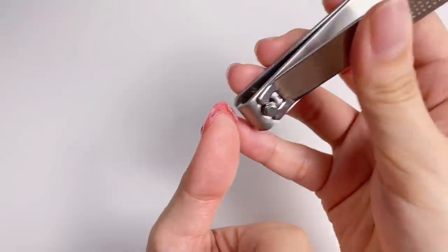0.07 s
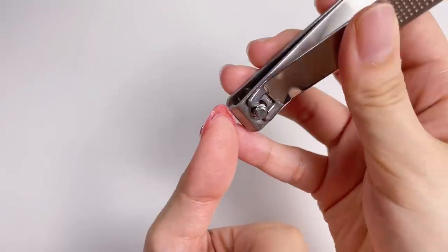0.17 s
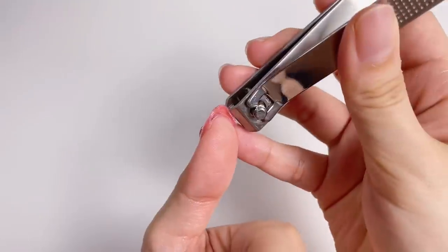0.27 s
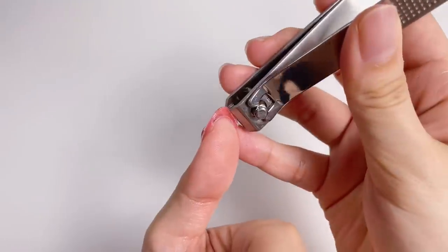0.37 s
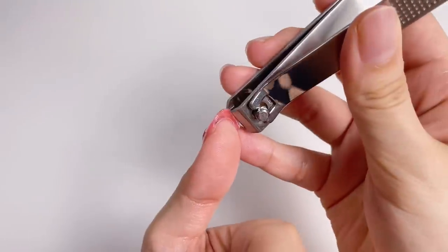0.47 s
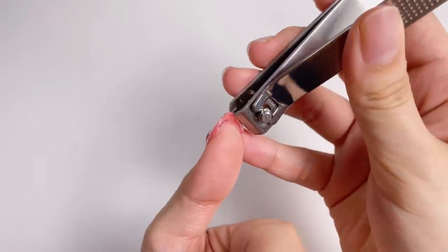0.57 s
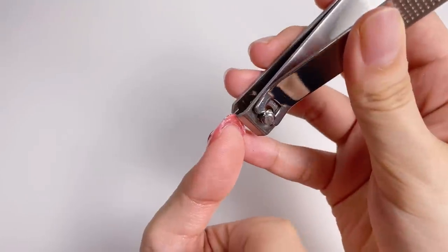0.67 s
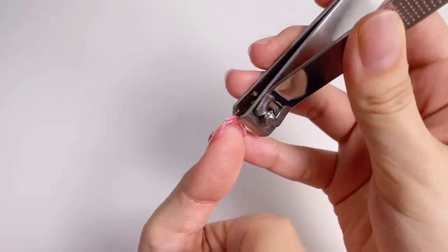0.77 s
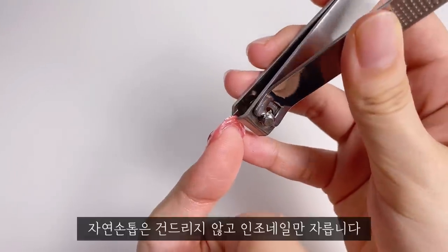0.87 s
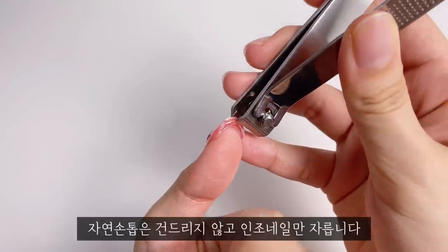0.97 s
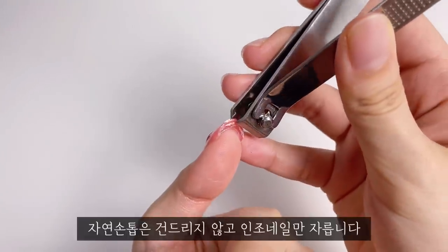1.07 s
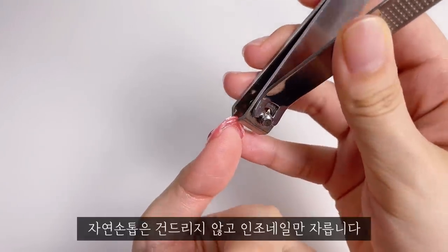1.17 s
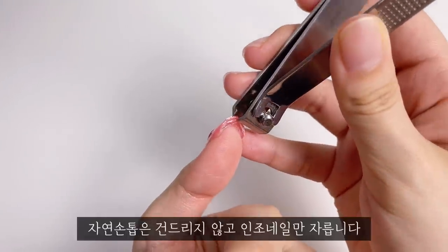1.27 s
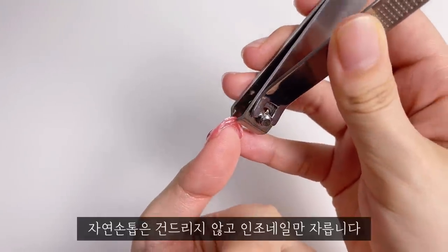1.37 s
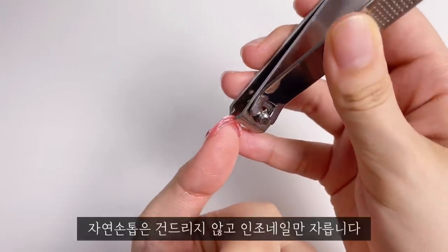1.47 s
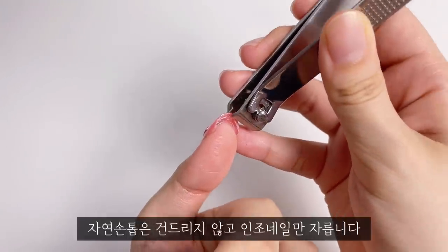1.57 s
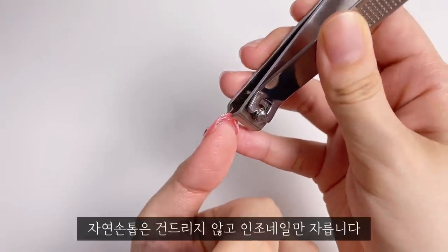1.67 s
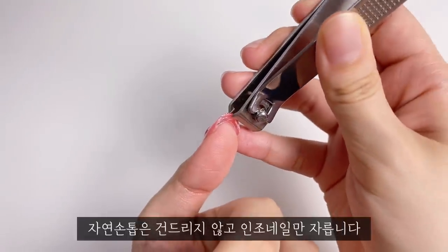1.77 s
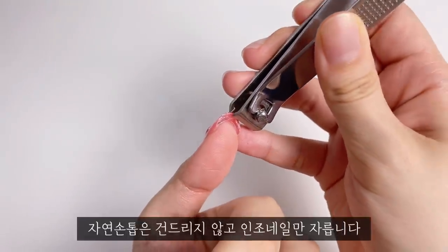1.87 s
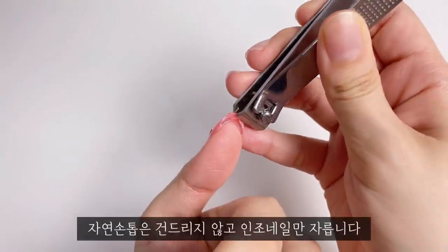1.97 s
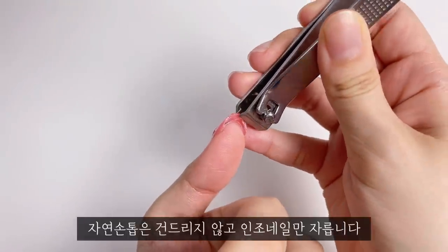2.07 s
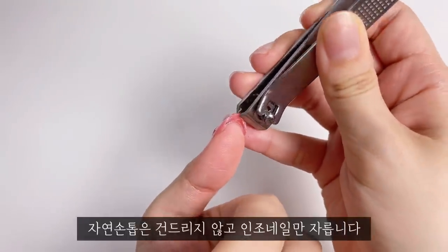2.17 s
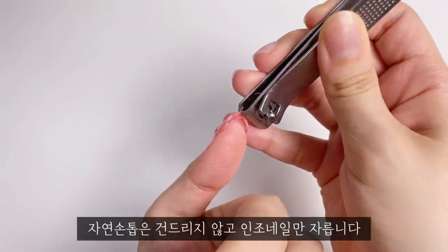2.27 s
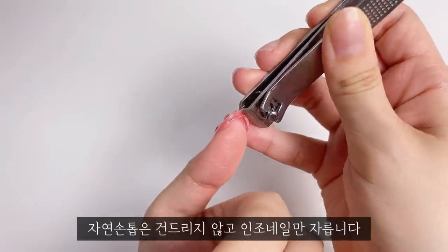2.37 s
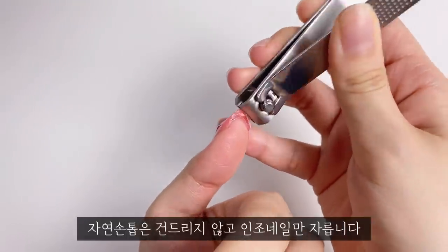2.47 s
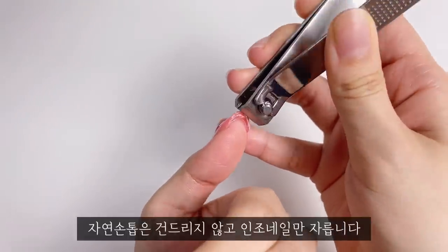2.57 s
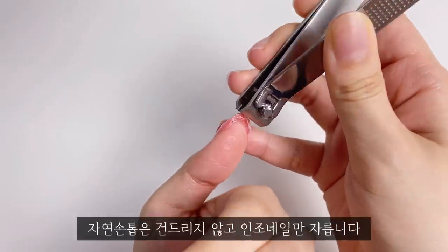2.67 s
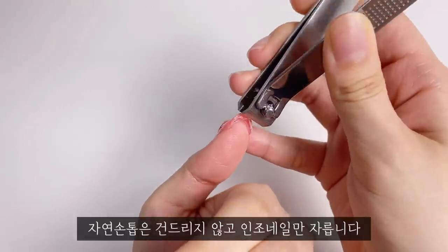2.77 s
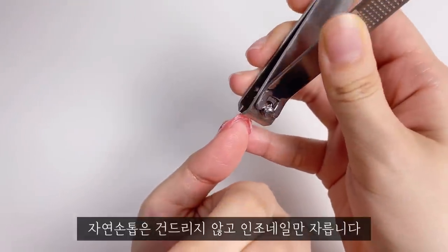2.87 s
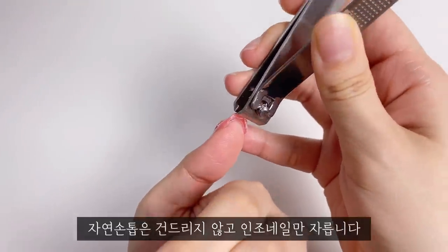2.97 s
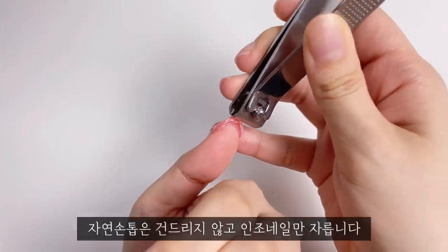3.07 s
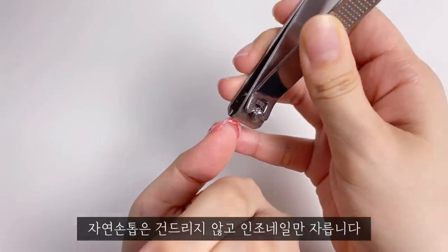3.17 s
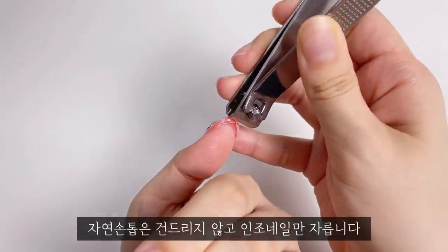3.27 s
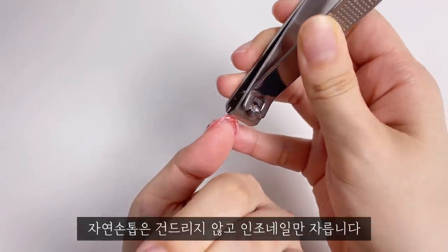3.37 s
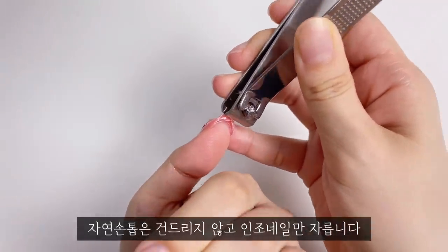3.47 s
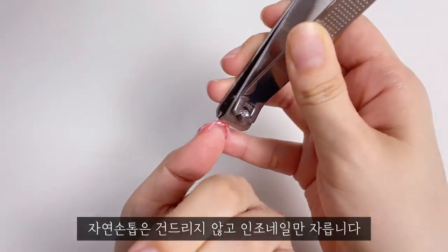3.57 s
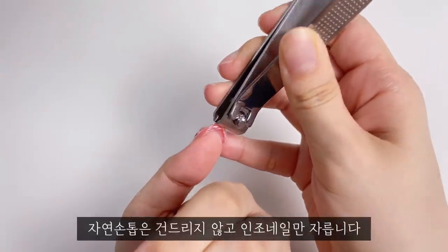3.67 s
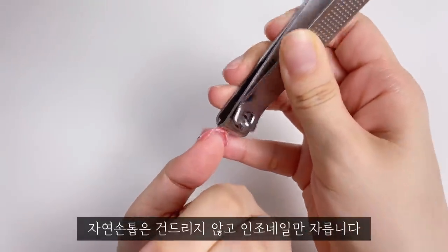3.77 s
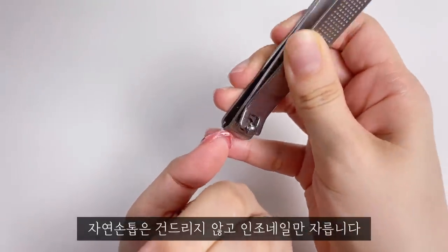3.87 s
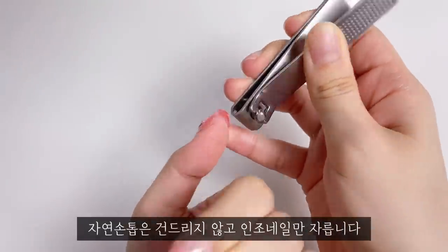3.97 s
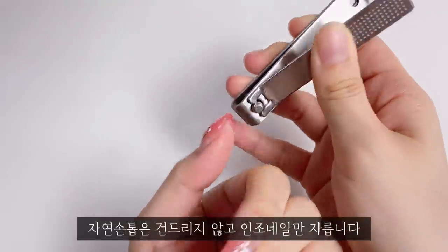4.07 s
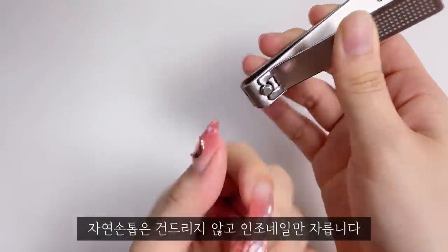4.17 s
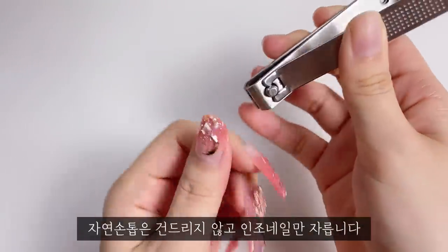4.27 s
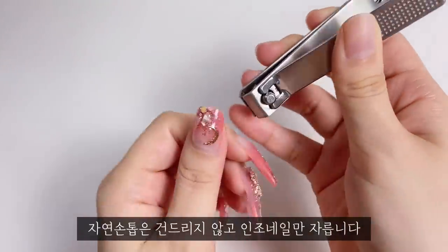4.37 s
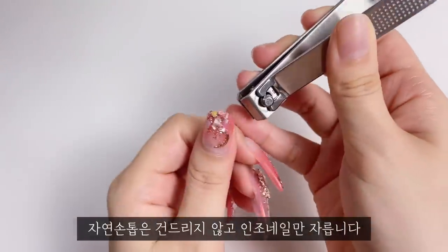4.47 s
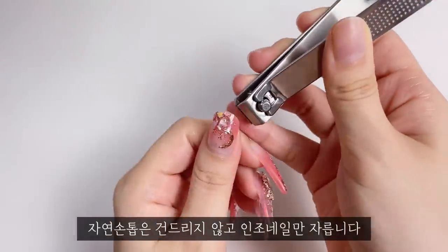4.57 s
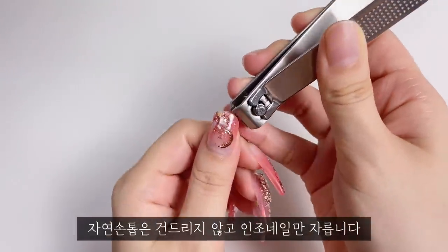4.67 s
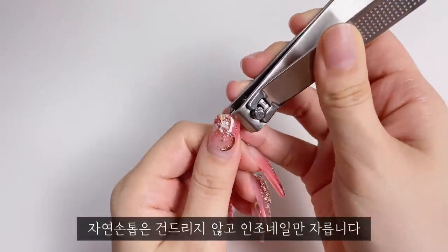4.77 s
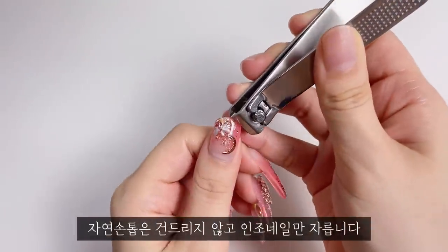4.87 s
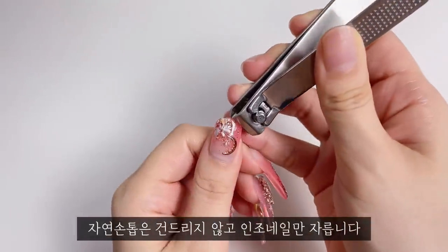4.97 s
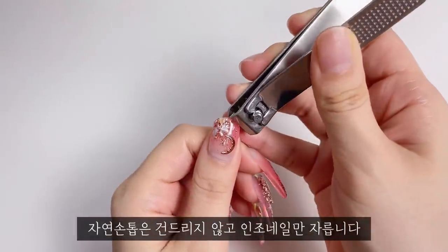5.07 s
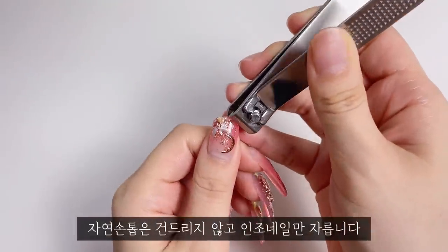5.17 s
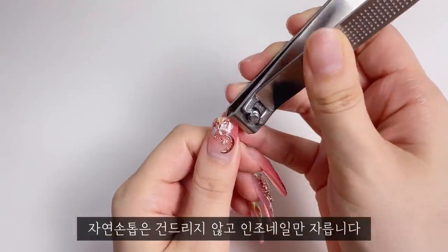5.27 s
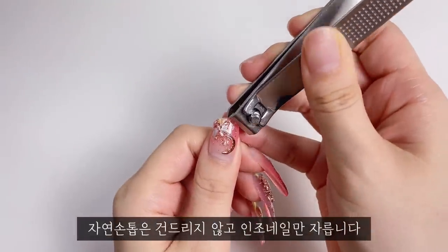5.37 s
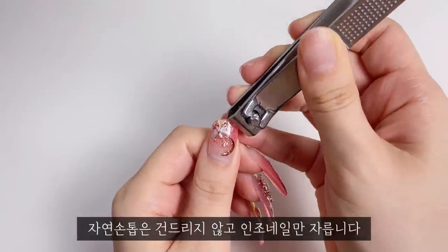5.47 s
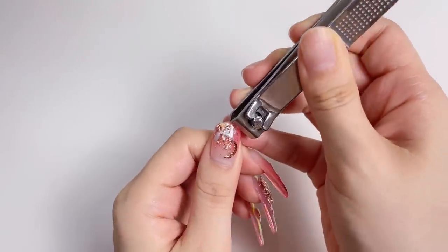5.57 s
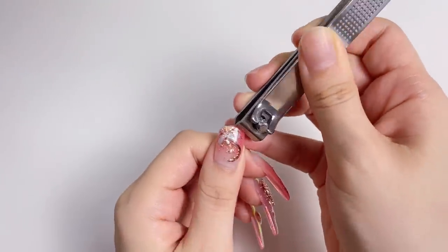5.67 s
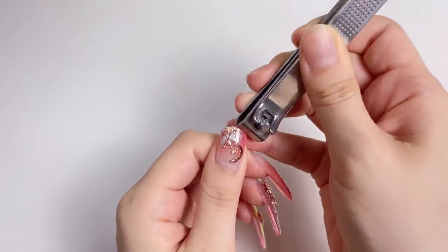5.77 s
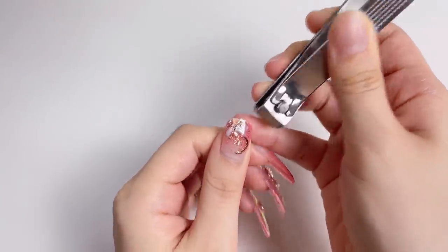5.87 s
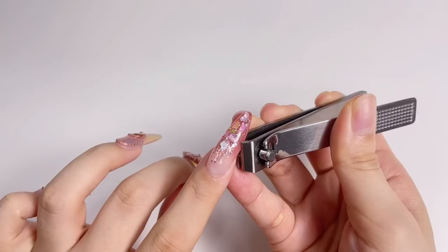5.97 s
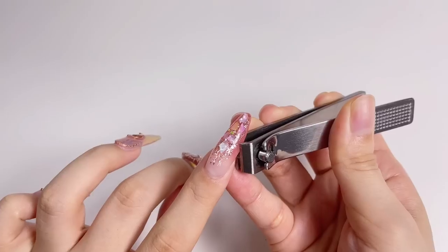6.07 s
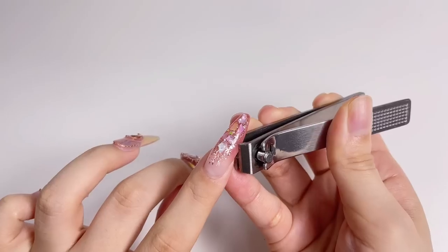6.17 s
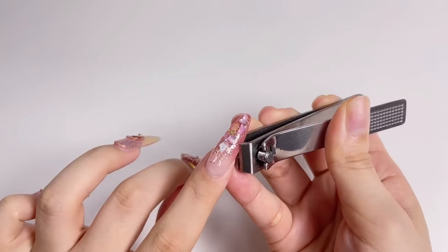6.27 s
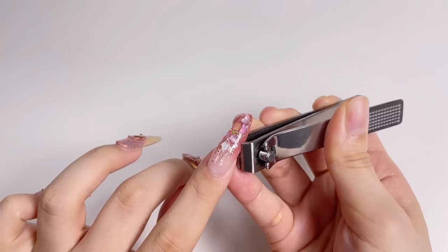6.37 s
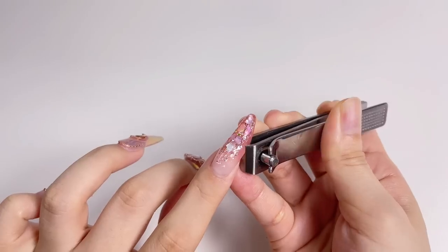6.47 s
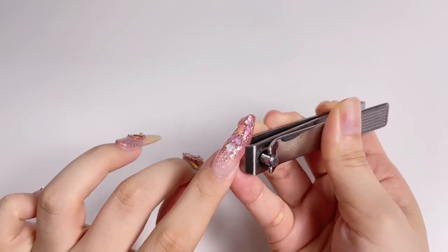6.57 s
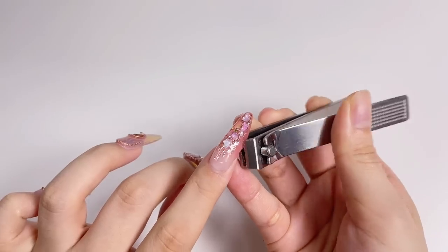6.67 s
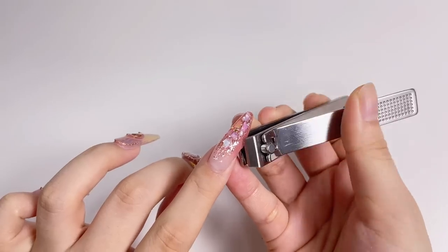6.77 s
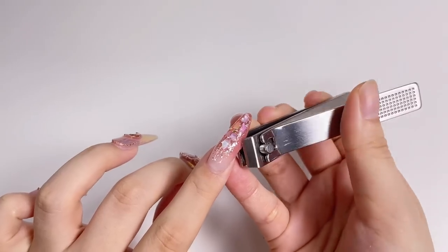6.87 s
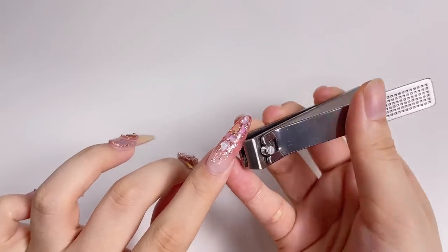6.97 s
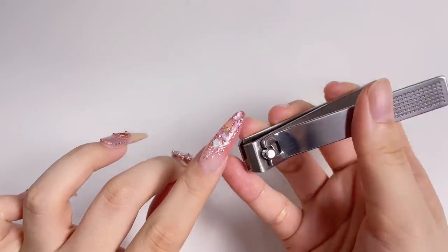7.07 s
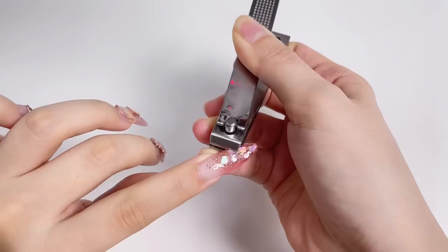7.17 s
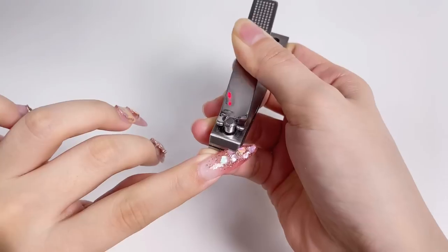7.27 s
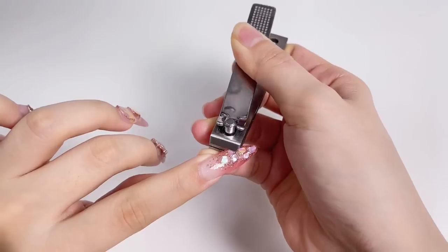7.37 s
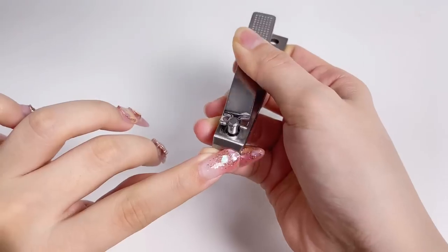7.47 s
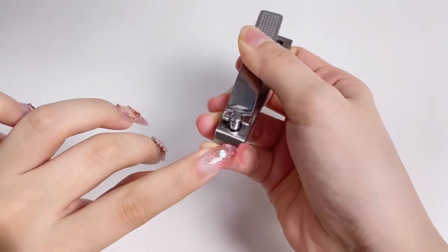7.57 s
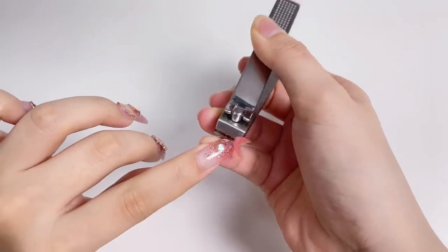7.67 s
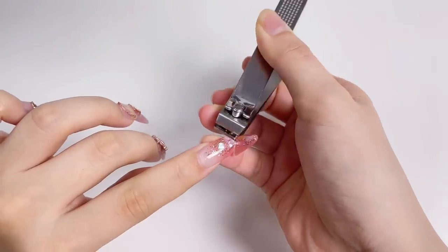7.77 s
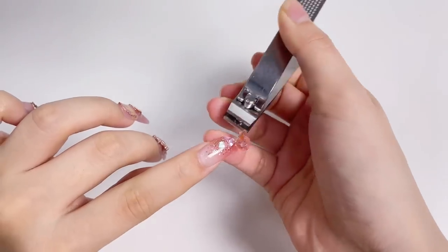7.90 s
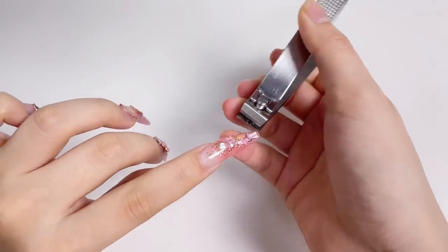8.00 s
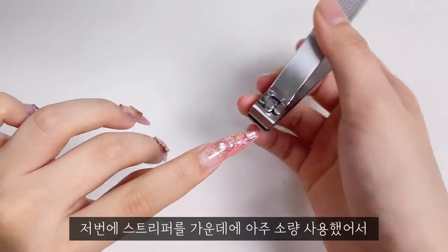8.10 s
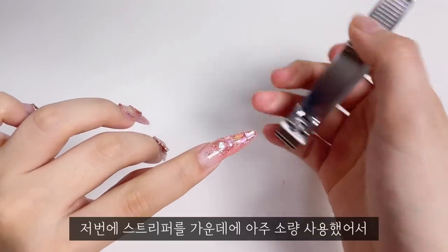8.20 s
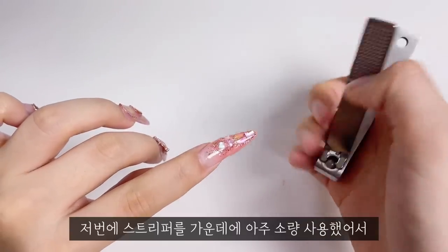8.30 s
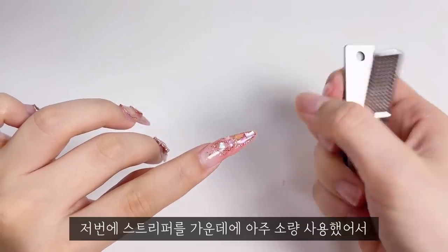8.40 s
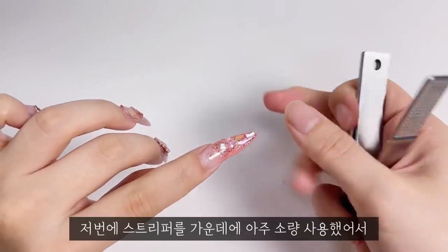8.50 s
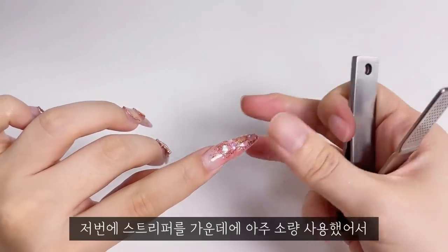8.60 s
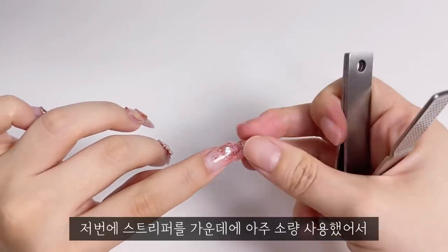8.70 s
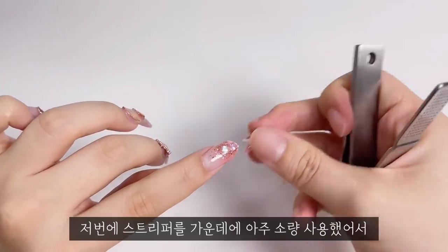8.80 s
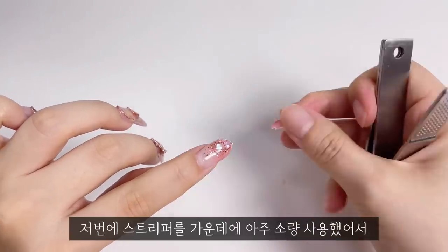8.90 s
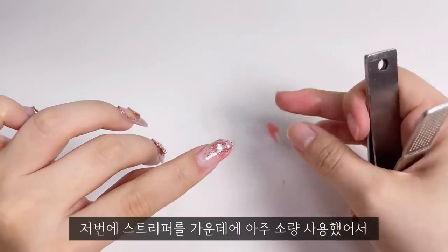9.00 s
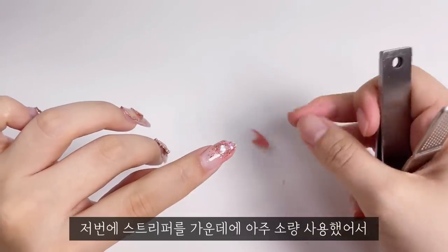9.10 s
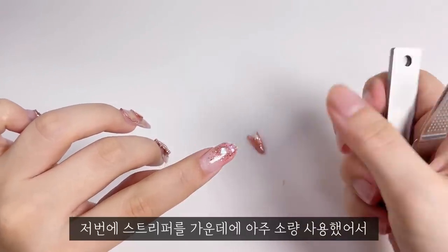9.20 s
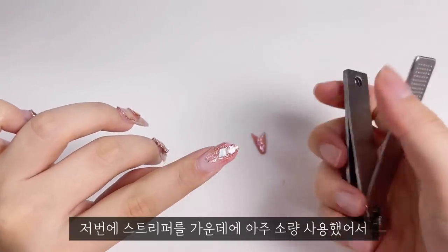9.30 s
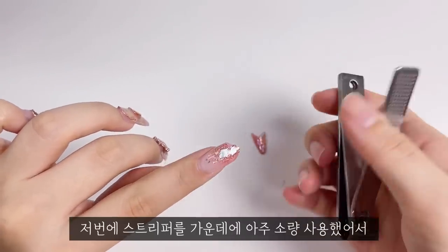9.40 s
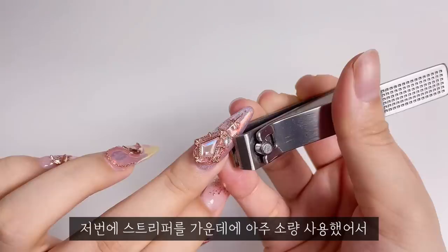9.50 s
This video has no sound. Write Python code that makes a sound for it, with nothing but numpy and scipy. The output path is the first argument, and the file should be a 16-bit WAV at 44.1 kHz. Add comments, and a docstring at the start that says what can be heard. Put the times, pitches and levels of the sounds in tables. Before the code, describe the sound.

Soft room hiss and low hand rumble lie beneath sharp nail clipping. Dry steel clicks separate five violent, bright snaps, each preceded by tiny cracks or accompanied by a dull jolt through the table. The last snaps come closer together, then there is near silence with faint rubbing before a hard little fragment clacks down and rattles to rest. Extremely close stereo miking, short room echo, overloaded peaks.

```python
"""A steel nail clipper at work on hard nail extensions, close to a stereo microphone on a table in a small
room. Hands rub and rumble softly under room air and hiss (shaped noise); first the lever clicks (steel
resonances). Then come bites: the nail crackles (tiny slips ring its resonances) and snaps, ringing the jaws,
jolting the table (decaying sines) and peaking hard enough to be clipped flat; clicks and rubs fall around and
between the bites. Near the end a cut piece drops and bounces, ringing its own resonances; delayed noise echoes
make the room."""
import sys
import numpy as np
from scipy import signal
from scipy.fft import rfft, irfft, next_fast_len
from scipy.io import wavfile

SR = 44100
rng = np.random.default_rng(int(sys.argv[2]) if len(sys.argv) > 2 else 0)


def file_out(sig):
    """Save sig as 16-bit WAV at sys.argv[1]."""
    # one column per channel
    cols = np.atleast_2d(sig).T
    # limit, then scale
    lim = np.clip(cols, -1, 1)
    pcm = np.round(lim * 32767).astype(np.int16)
    wavfile.write(sys.argv[1], SR, pcm)


N = 420713
TIME = np.arange(N) / SR   # s


def from_db(db):
    """Decibels to gain."""
    return 10 ** (np.asarray(db) / 20)


def rms_one(x):
    """Scale to rms 1."""
    return x / np.sqrt(np.mean(x ** 2) + 1e-20)


def at_hz(points, hz, axis=1):
    """Read one column of a table on a log-frequency axis."""
    columns = np.transpose(points)
    return np.interp(np.log(np.maximum(hz, 1)), np.log(columns[0]), columns[axis])


def add(track, s, sound):
    """Mix a stereo sound in at a time in seconds."""
    i = int(round(s * SR))
    track[:, i:i + sound.shape[1]] += sound[:, :N - i]


def stereo_noise(size, alike):
    """White noise whose two channels correlate by alike: 1 the same, 0 unrelated, -1 opposite."""
    mid, side = rng.standard_normal((2, size))
    opposite = np.array([[1], [-1]])
    return np.sqrt((1 + alike) / 2) * mid + np.sqrt((1 - alike) / 2) * side * opposite


def coloured(spectrum, alike):
    """Steady stereo noise with a given spectrum."""
    size = next_fast_len(N)
    gains = from_db(at_hz(spectrum, np.fft.rfftfreq(size, 1 / SR)))
    return irfft(rfft(stereo_noise(size, alike)) * gains, size)[:, :N]


def resonate(x, hz, width):
    """Two-pole resonance with gain 1 on top."""
    r = np.exp(-np.pi * width / SR)
    zeros = np.array([1, 0, -1]) * (1 - r * r) / 2
    poles = [1, -2 * r * np.cos(2 * np.pi * hz / SR), r * r]
    return signal.lfilter(zeros, poles, x + 1e-18)


def volley(fall_ms, grain_db, alike):
    """A dying run of tiny slips of uneven strength, from a flattened spectrum; returns it with its envelope."""
    fall = fall_ms * SR / 1000
    n = np.arange(next_fast_len(int(3 * fall) + SR // 50))
    envelope = from_db(-20 * n / fall)
    grain = from_db(grain_db * rng.standard_normal(len(n)))
    spectrum = rfft(stereo_noise(len(n), alike) * grain * envelope)
    even = irfft(spectrum / np.abs(spectrum), len(n))
    return even * envelope ** 0.17, envelope


def strikes(events, modes, gain_db, tick_db, contact_db, rise_ms, grain_db, alike):
    """Slips ring the modes of the struck part; gives the direct sound and the room's share."""
    direct, to_room = np.zeros((2, 2, N))
    for s, db, fall_ms, bright_db, room_db, contact_hz in events:
        slips, envelope = volley(fall_ms, grain_db, alike)
        slips = slips * (1 - np.exp(-1000 * TIME[:len(envelope)] / rise_ms))
        ring = 0
        for k, (hz, width, mode_db) in enumerate(modes):
            tilt_db = bright_db * np.log2(hz / 10000)
            gain = from_db(mode_db + tilt_db + rng.normal(0, 1.0))
            ring = ring + (-1) ** k * gain * resonate(slips, hz, width)
        ring = ring + from_db(tick_db) * slips
        # the point of contact favours one pitch
        ring = ring + from_db(contact_db) * resonate(ring, contact_hz, 350)
        # the envelope sets the energy, so modes and brightness do not change the level
        level = np.sqrt(2 * np.sum(envelope ** 2) / np.sum(ring ** 2))
        sound = from_db(db + gain_db) * ring * level
        add(direct, s, sound)
        add(to_room, s, sound * from_db(room_db))
    direct[0] = np.roll(direct[0], 1)   # the left capsule is slightly farther away
    return np.array([direct, to_room])


def snaps():
    """The nail breaks and rings the jaws closed on it."""
    # Each row: start in seconds, level in dB before gain_db, envelope's time to fall 20 dB in ms,
    # brightness in dB per octave, share sent to the room in dB, contact pitch in Hz.
    breaks = [(2.1804, 1.05, 5, -0.3, -14, 4270), (3.7637, -9.5, 3, 15, -12, 13800),
              (3.7669, -8, 4.5, 4.5, -9.5, 11900), (3.7822, -15, 7.5, -2, -19, 2620),
              (3.7847, -3, 5, -0.2, -14.5, 7040), (5.6711, 5, 9.5, -0.2, -14, 8750),
              (6.4287, 5.5, 17, 1.66, -10, 11970), (7.4210, 1.5, 8.5, -2, -11.5, 11970),
              (7.4245, -1.5, 10, 0.5, -7, 4520)]
    # Resonances of the closed jaws. Each row: pitch in Hz, width in Hz, relative level in dB.
    jaws = [(647, 220, -20), (1560, 700, -8.5), (2430, 840, -9), (4238, 490, -5), (4840, 210, -6),
            (6670, 900, -1.5), (8546, 320, -1.5), (9830, 520, 2.5), (10744, 590, 3), (11540, 900, 3),
            (12520, 650, 0), (14120, 1300, -2.5)]
    return strikes(breaks, jaws, gain_db=3.5, tick_db=-24.5, contact_db=-1.5,
                   rise_ms=0.21, grain_db=5.0, alike=0.8)


def cracks():
    """Each bite stresses the nail: a few clear cracks among faint ones at random moments and pitches."""
    # The louder cracks. Each row: start in seconds, level in dB before gain_db, contact pitch in Hz.
    loud_cracks = [(1.9715, -41.5, 8190), (2.0663, -31, 14550), (2.1167, -37.5, 14280),
                   (2.1551, -39, 14250), (2.1775, -30, 14530), (3.7055, -37.5, 12500), (3.7156, -26, 12650),
                   (3.7480, -34, 12720), (6.3566, -34.5, 8150), (6.3960, -23.5, 12300),
                   (6.4042, -31, 14900), (7.1453, -33.5, 14440), (7.2051, -38, 8200), (7.2316, -34.5, 8200),
                   (7.2762, -27.5, 8300), (7.2815, -29.5, 12600), (7.3747, -38.5, 14640)]
    # The jaws bite into the nail. Each row: start in seconds, end in seconds.
    bites = [(1.96, 2.17), (3.70, 3.76), (6.34, 6.42), (7.151, 7.42)]
    # Resonances of the stressed nail. Each row: pitch in Hz, width in Hz, relative level in dB.
    nail = [(4700, 280, -13.5), (6500, 500, -8.5), (8150, 590, -6), (10870, 900, -5), (12700, 810, 1.5),
            (14650, 830, -0.5)]
    crackles_per_s = 45
    faintest_db, mean_excess_db = -49, 4   # before gain_db
    fall_ms, bright_db, room_db = 4.4, -0.6, -9.5   # envelope's fall by 20 dB; per octave; share to the room
    hits = list(loud_cracks)
    for start, end in bites:
        length = end - start
        for when, size, pitch in rng.random((int(crackles_per_s * length), 3)):
            db = faintest_db - mean_excess_db * np.log(1 - size)
            contact_hz = nail[int(pitch * len(nail))][0]
            hits.append((start + when * length, db, contact_hz))
    events = [(s, db, fall_ms, bright_db, room_db, hz) for s, db, hz in hits]
    return strikes(events, nail, gain_db=3.0, tick_db=-27.0, contact_db=-5.5,
                   rise_ms=0.3, grain_db=1.5, alike=0.5)


def clicks():
    """Lever and jaws: steel meets steel briefly; the hand damps every click alike."""
    # Each row: start in seconds, level in dB before gain_db, brightness in dB per octave, contact pitch in Hz.
    lever_clicks = [(0.3089, -27.5, -1, 5450), (2.427, -24.5, -1.5, 4170), (2.6994, -15.5, 1.1, 11100),
                    (3.947, -29, -2, 11700), (3.9520, -26, 4.5, 6660), (4.0875, -38.5, -.5, 9300),
                    (4.1657, -41, -0.5, 9500), (5.4359, -36, 4, 6250), (5.883, -42.5, -6.5, 1360),
                    (5.9545, -45.5, -5.5, 2410), (8.2552, -39, -6, 6250), (8.3133, -41, -8.5, 2417),
                    (8.9796, -44, -4, 2430)]
    # Resonances of the free clipper. Each row: pitch in Hz, width in Hz, relative level in dB.
    clipper = [(480, 320, -26), (1007, 290, -9.5), (1650, 230, -9.5), (2340, 300, -6), (3456, 230, -10),
               (4096, 194, -2.5), (5425, 286, -6), (6440, 280, -3), (7640, 420, -5.5), (9430, 360, -4),
               (10130, 600, -5), (11510, 320, -2), (12000, 300, -10), (14150, 1300, -11.5)]
    fall_ms, room_db = 4.5, -16   # envelope's fall by 20 dB; share sent to the room
    events = [(s, db, fall_ms, bright_db, room_db, hz) for s, db, bright_db, hz in lever_clicks]
    return strikes(events, clipper, gain_db=2.3, tick_db=-22.5, contact_db=4.0,
                   rise_ms=0.393, grain_db=8.0, alike=0.66)


def bounces():
    """The cut piece bounces; the softer it lands, the duller it sounds."""
    # Each row: start in seconds, level in dB, contact pitch in Hz.
    landings = [(9.0490, -.5, 7470), (9.1402, -3.5, 7900), (9.1857, -17, 7600), (9.1989, -11, 7760),
                (9.2633, -29.5, 8040), (9.2692, -23, 7250)]
    # Resonances of the cut piece. Each row: pitch in Hz, width in Hz, relative level in dB.
    piece = [(640, 750, -22.5), (1610, 860, -10.5), (2800, 400, -10.5), (4120, 1500, -11),
             (6770, 1260, -6.5), (7490, 670, 0.5), (7790, 610, 2), (10200, 1500, -5), (12300, 1200, -8.5),
             (14300, 950, -7.5)]
    fall_ms, room_db = 3.9, -8.5   # envelope's fall by 20 dB; share sent to the room
    bright_db, dulling = 0.8, 0.098   # per octave at 0 dB; lost with each dB of a softer landing
    events = [(s, db, fall_ms, bright_db + dulling * db, room_db, hz) for s, db, hz in landings]
    return strikes(events, piece, gain_db=0.0, tick_db=-26, contact_db=-5.0,
                   rise_ms=0.15, grain_db=5.0, alike=0.8)


def slides():
    """Fingers and clipper rub and slide: slower, longer runs of slips that reach the room alike."""
    # Each row: start in seconds, level in dB before gain_db, envelope's time to fall 20 dB in ms,
    # brightness in dB per octave, contact pitch in Hz.
    rubs = [(1.572, -51.5, 76.5, -11, 430), (3.529, -57, 149.5, -2.5, 1710), (8.22, -53, 58.5, -2, 7800),
            (8.252, -50.5, 72.5, -1.5, 2400), (8.345, -52, 221.5, 1.4, 10700), (9.039, -30, 28, -7.5, 1660),
            (9.130, -37, 46.5, -4, 7760), (9.287, -46, 42.5, -3, 7500), (9.340, -47, 42.5, -1, 4150),
            (9.450, -53.5, 64, 3.5, 12000)]
    # Resonances of the clipper rubbed by fingers. Each row: pitch in Hz, width in Hz, relative level in dB.
    grip = [(325.2, 170, -19.5), (650, 450, -8.5), (1239, 1050, -4.5), (2174, 1500, -5), (3940, 1100, -6),
            (6300, 533, -1.5), (7760, 695, -4), (10500, 1300, -6), (11800, 670, -2), (13500, 1217, -6.5)]
    room_db = -6   # share sent to the room
    events = [(s, db, fall_ms, bright_db, room_db, hz) for s, db, fall_ms, bright_db, hz in rubs]
    return strikes(events, grip, gain_db=4.0, tick_db=-17.5, contact_db=0.0,
                   rise_ms=4.5, grain_db=9.5, alike=0.867)


def table_thumps(rise_s, right_db, phase_spread):
    """Each jolt sets the table and stand swinging, differently under each capsule."""
    # Recoil and bumps of the hands. Each row: start in seconds, level in dB,
    # ring time as a share of the table's own.
    jolts = [(2.184, -9, 0.61), (2.333, -29, 0.52), (3.787, -10, 1), (5.44, -34.5, 0.51),
             (5.673, -8.5, 0.93), (5.855, -31, .7), (6.432, -19.5, 0.77), (6.54, -29, 0.52),
             (7.423, -5.5, 0.15), (9.045, -34, 0.6)]
    # Modes of table and microphone stand. Each row: pitch in Hz, relative level in dB,
    # time to fall 60 dB in seconds at a full share.
    table_modes = [(25.6, -19, 1.3), (44.7, -19, 1.5), (74, -19.5, 0.52), (125, -1.5, 0.35),
                   (135.7, -5.5, 0.27), (169.4, -2.5, 0.2), (207.4, -7.5, 0.34), (242.2, -3.5, 0.2),
                   (310, -18.5, 0.22), (376, -24.5, 0.083), (452, -22.5, 0.18), (540, -14.5, .035),
                   (670, -27, 0.064)]
    out, t = np.zeros((2, N)), TIME[:SR]
    for s, db, share in jolts:
        swing = 0
        for hz, mode_db, t60 in table_modes:
            lead = rng.choice([-1, 1]) * np.array([[0], [phase_spread]])   # right capsule against left, radians
            phase = rng.uniform(0, 2 * np.pi) + lead
            decay = from_db(mode_db - 60 * t / (t60 * share))
            swing = swing + decay * np.sin(2 * np.pi * hz * t + phase)
        onset = 1 - np.exp(-t / rise_s)
        add(out, s, from_db(db) * swing * onset * from_db([[0], [right_db]]))
    return out


def room(x, build_s, alike):
    """Dense echoes build up within milliseconds and die band by band."""
    # Each row: pitch in Hz, time to fall 60 dB in seconds, relative level of the echo in dB.
    echo_bands = [(300, 0.41, -8), (700, 0.35, -7.5), (1460, 0.3, 0), (4000, 0.26, 0.5), (7980, 0.33, -3.5),
                  (12100, 0.21, -0.5), (16000, 0.33, -1.5)]
    t, edges = TIME[:SR // 2], np.geomspace(200, 17000, 13)
    response = 0
    for low, high in zip(edges, edges[1:]):
        hz = np.sqrt(low * high)
        band = signal.butter(2, [low, high], "band", fs=SR, output="sos")
        echoes = signal.sosfilt(band, stereo_noise(len(t), alike))
        decay_db = -60 * t / at_hz(echo_bands, hz, axis=1)
        response = response + echoes * from_db(at_hz(echo_bands, hz, axis=2) + decay_db)
    response = response * (1 - np.exp(-(t / build_s) ** 2))
    response = response / np.sqrt(np.sum(response ** 2) / 2)
    return signal.fftconvolve(x, response, axes=1)[:, :N]


def hand_motion(resting_db):
    """Strength of the rumble: resting hands, and lurches that swell quickly and settle slowly."""
    # Hands resting on the table. Each row: time in seconds, rumble in dB before resting_db and rumble_db.
    resting = [(0.0, -44.5), (1.86, -48.5), (2.34, -37), (2.82, -45.5), (3.56, -47.5), (4.01, -37),
               (5.18, -46), (5.71, -36.5), (6.06, -51), (6.61, -41), (7.12, -57.5), (9.54, -55)]
    # The hands lurch as the nail gives way, or shift their grip.
    # Each row: peak time in seconds, peak rumble in dB before rumble_db.
    lurches = [(.25, -36.5), (2.25, -26), (3.86, -22.5), (4.38, -29.5), (5.52, -34), (5.76, -26),
               (6.51, -23)]
    rise, fall = 129, 54.5   # dB per second
    power = from_db(np.interp(TIME, *np.transpose(resting)) + resting_db) ** 2
    for s, db in lurches:
        below_peak_db = np.maximum(rise * (s - TIME), fall * (TIME - s))
        power = power + from_db(db - below_peak_db) ** 2
    return np.sqrt(power)


def background(air_db, rumble_db):
    """Room air and hiss, with the rumble of hands on the table, all as shaped noise."""
    # Still air and microphone hiss. Each row: pitch in Hz, relative density in dB per Hz.
    air_spectrum = [(20, 0.5), (60, 0.5), (85, -9.5), (160, -15), (215, -16), (255, -7), (310, -17.5),
                    (600, -24), (1200, -29), (3000, -32), (8000, -35.5), (13000, -36), (13700, -29),
                    (14300, -35.5), (15500, -38)]
    # Hands on the table. Each row: pitch in Hz, relative density in dB per Hz.
    rumble_spectrum = [(20, 0), (28, -1.5), (45, 2.5), (60, -8), (100, -22.5), (200, -26.5), (400, -40.5),
                       (1000, -82.5)]
    air = coloured(air_spectrum, alike=0.16)
    # air_db is the level of the part above 300 Hz
    audible = signal.sosfilt(signal.butter(2, 300, "high", fs=SR, output="sos"), air)
    rumble = rms_one(coloured(rumble_spectrum, alike=-0.4))
    rumble = rumble * hand_motion(resting_db=3.5) * from_db(rumble_db)
    return air / np.std(audible) * from_db(air_db) + rumble


def scene():
    """Clipper and nail in front of the microphone, the room behind them."""
    direct, to_room = snaps() + cracks() + clicks() + bounces() + slides()
    thumps = table_thumps(rise_s=0.0016, right_db=-4.0, phase_spread=1.2)
    echoes = room(to_room, build_s=0.003, alike=0.17)
    return direct + echoes + thumps + background(air_db=-55.5, rumble_db=4.0)


def record(dry):
    """The loudest snaps are clipped flat; a steep low-pass then cuts the top."""
    cutoff_hz = 15900
    clipped = np.clip(dry, -1, 1)
    low_pass = signal.ellip(10, 0.2, 70, cutoff_hz, fs=SR, output="sos")   # 0.2 dB ripple, 70 dB down
    return signal.sosfilt(low_pass, clipped)


dry = scene()
out = record(dry)
file_out(out)
```